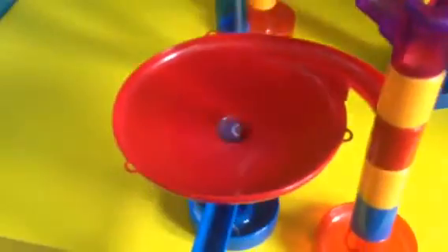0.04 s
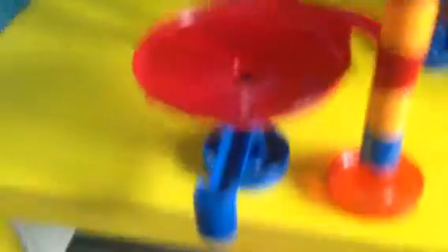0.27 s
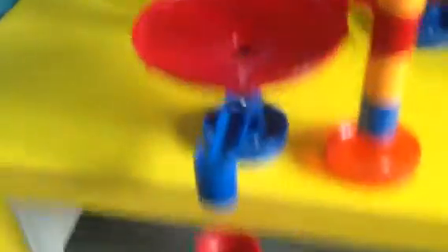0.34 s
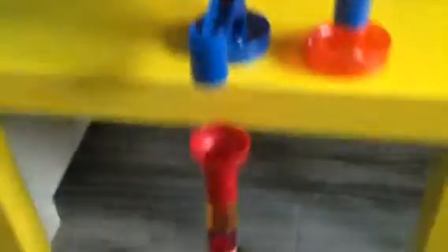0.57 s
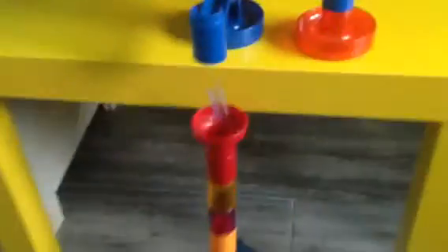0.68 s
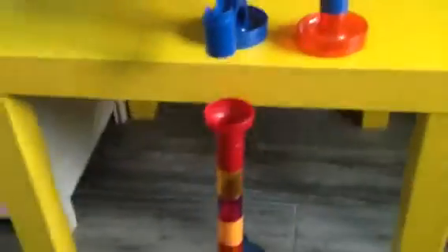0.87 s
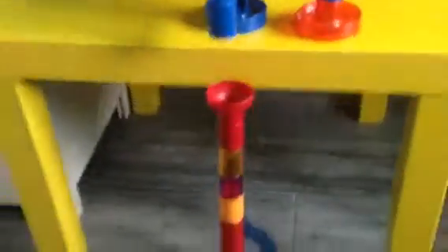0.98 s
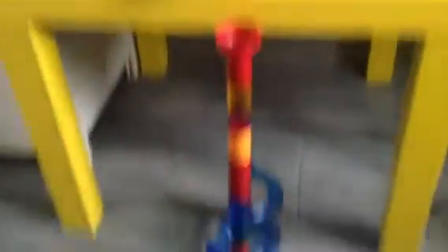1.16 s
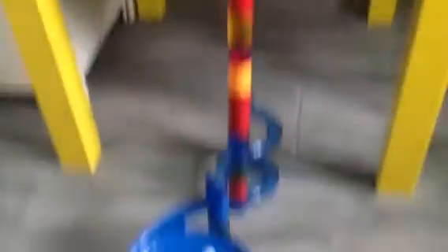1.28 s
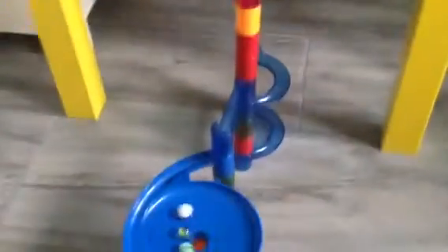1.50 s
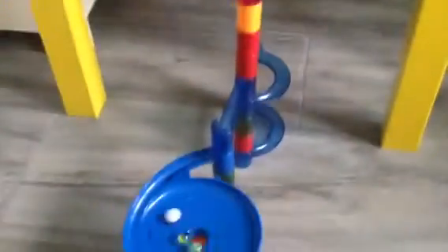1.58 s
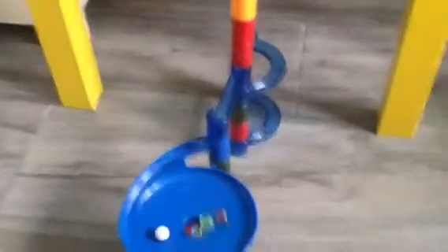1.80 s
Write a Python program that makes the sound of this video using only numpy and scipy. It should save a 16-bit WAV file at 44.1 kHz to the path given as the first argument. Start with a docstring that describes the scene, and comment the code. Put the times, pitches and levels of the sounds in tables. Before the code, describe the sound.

Glass marbles clatter on a plastic marble run in a small room. Light rolling in a funnel gives way to bursts of sharp clicks and hollow knocks, a soft bump on the microphone, and a brief roll in a dish.

```python
"""A small, hard room, where glass marbles run down a plastic marble run.
One whirls round the neck of a funnel and rattles through it and the column below, then knocks down
a chute, a cup, a tower and a spiral into a dish. Rolling is a stream of tiny bumps that keeps the
plastic ringing; each knock is a short crack plus the ring of the struck part, and the room answers.
Faint room tone lies underneath, and one soft bump touches the microphone."""
import sys
import numpy as np
from scipy import signal
from scipy.io import wavfile

SR = 44100
rng = np.random.default_rng(int(sys.argv[2]) if len(sys.argv) > 2 else 0)


def materialize(psi):
    """Save the field psi as 16-bit PCM at rate SR to the path in sys.argv[1].

    A 1-D psi becomes a single channel; in a 2-D psi each row is a channel.
    """
    bounded = np.clip(np.atleast_2d(psi).T, -1, 1)
    quanta = np.round(bounded * 32767).astype(np.int16)
    wavfile.write(sys.argv[1], SR, quanta)


N = 81585


def amp(db):
    """Decibels to gain."""
    return 10 ** (np.asarray(db) / 20)


def unit(x):
    """Scales to an energy of one."""
    return x / np.sqrt(np.sum(x ** 2) + 1e-20)


def curve_at(points, hz):
    """Reads a curve on a log-frequency axis."""
    point_hz, value = np.transpose(points)
    return np.interp(np.log(hz + 1), np.log(point_hz + 1), value)


def add(mix, start_s, sound):
    """Mixes a sound in at a time."""
    span = mix[round(start_s * SR):][:len(sound)]
    span += sound[:len(span)]


def eq_pulse(*curves, size=4096):
    """A minimum-phase click coloured by the stacked EQ curves."""
    hz = abs(np.fft.fftfreq(size, 1 / SR))
    log_gain = np.log(amp(sum(curve_at(points, hz) for points in curves)))
    spectrum = np.exp(np.conj(signal.hilbert(log_gain)))
    return np.fft.ifft(spectrum).real[:size // 2]


# Colour of the room tone. Each row: frequency in Hz, relative level in dB.
ROOM_TONE_EQ = [(25, -58), (70, -23), (160, 13.5), (300, -16), (700, -6.5), (1600, 15.5), (3500, -2),
                (8000, -20.5), (16000, -42)]
def room_tone(level_db=-64.5):
    """A faint, steady bed of coloured noise."""
    noise = signal.fftconvolve(rng.standard_normal(N), eq_pulse(ROOM_TONE_EQ))[:N]
    return amp(level_db) * np.sqrt(N) * unit(noise)


# Fader rides for the rolling in the funnel and in the dish; the end levels hold before and after.
# Each row: time in seconds, level in dB.
FUNNEL_FADER = [(0, -41.5), (.075, -52), (.11, -43.5), (.2, -41.5), (.28, -40), (.42, -35), (.5, -40),
                (.6, -45.5), (.67, -43), (.76, -44.5), (1.05, -55.5), (1.3, -52)]
DISH_FADER = [(1.25, -45), (1.4, -50.5), (1.52, -47), (1.59, -36.5), (1.65, -50), (1.72, -53), (1.79, -51),
              (1.85, -62)]
# Colour of one tiny bump on each surface. Each row: frequency in Hz, relative level in dB.
FUNNEL_GRAIN_EQ = [(40, -44), (100, -21), (170, -3.5), (350, -9.5), (700, 1), (1100, -1.5), (2000, -4),
                   (3200, -13.5), (6000, -25), (10000, -23), (16000, -22)]
DISH_GRAIN_EQ = [(40, -24.5), (170, -9.5), (400, -5), (800, 1.5), (1100, -4), (1650, 6.5), (2500, 6.5),
                 (5000, -12), (10000, -12.5), (16000, -32.5)]
def rolling(part, grains_per_s=2500, spread_db=4, ring_db=0.5, dry_db=1):
    """Tiny bumps under a rolling marble keep the part's modes sounding."""
    fader, eq = {"funnel": (FUNNEL_FADER, FUNNEL_GRAIN_EQ), "dish": (DISH_FADER, DISH_GRAIN_EQ)}[part]
    sizes = amp(spread_db * np.minimum(rng.exponential(1, N), 4))
    signs = rng.choice([-1., 1.], N)
    hits = rng.random(N) < grains_per_s / SR
    grains = signal.fftconvolve(sizes * signs * hits, eq_pulse(eq))[:N]
    direct = grains + amp(ring_db) * signal.fftconvolve(grains, plastic_ring(part))[:N]
    sound = amp(dry_db) * direct + signal.fftconvolve(direct, room_tail())[:N]
    level_db = np.interp(np.arange(N) / SR, *np.transpose(fader))
    return unit(sound) * np.sqrt(N) * amp(level_db)


# Resonances of each plastic part. Each row: pitch in Hz, bandwidth in Hz, relative level in dB.
FUNNEL_MODES = [(208, 31, 5.5), (670.5, 34, 5.5), (1288, 97, 11), (1605, 38, 15), (2454, 18, 6.5),
                (4306, 210, 2.5), (6140, 130, 6.5), (8870, 270, 2)]
COLUMN_MODES = [(140, 20, 9), (172, 20, 10), (218, 7, 21), (577, 10, 13), (669, 9, 15), (830, 14, 9),
                (1070, 30, 7), (1201, 10, 15), (1272, 14, 16), (1465, 20, 7), (1535, 30, 8), (1580, 20, 10),
                (1615, 7, 26), (2570, 20, 3), (2980, 25, 7), (3760, 80, 3), (4400, 200, 1), (4772, 25, 5)]
CHUTE_MODES = [(190, 20, 8), (680, 30, 3), (1211, 10, 21), (1320, 18, 13), (1405, 18, 12), (1491, 15, 14),
               (1612, 9, 19), (2315, 40, 0), (3677, 200, 3), (6153, 90, 0), (10500, 500, -2)]
CUP_MODES = [(1860, 14, 9), (1965, 30, 3), (3882, 8, 14), (7407, 70, 1), (9274, 12, 13), (9315, 20, 8),
             (9393, 20, 8), (10227, 120, 2), (11010, 60, 1), (12000, 200, 1), (14200, 400, 5),
             (14800, 400, 4)]
TOWER_MODES = [(1613, 95, -2.5), (1977, 38, -4), (2578, 42, 0), (2870, 25, 0), (3135, 40, -3.5),
               (3640, 16, 3.5), (4520, 590, -4.5)]
SPIRAL_MODES = [(520, 40, 1), (1556, 30, 3), (1675, 30, 0), (1986, 30, 0), (2178, 30, 0), (2770, 120, -1),
                (3560, 60, -2), (4950, 260, 9)]
DISH_MODES = [(409, 14, 6), (748, 12, 5), (843, 6, 14), (1428, 20, 5), (1560, 40, 3), (1690, 16, 5),
              (1975, 20, 3), (2447, 20, 3), (2770, 40, 1), (3967, 30, 1), (4870, 200, 0)]
# How strongly each part rings. Each entry: part, trim in dB.
RING_TRIM_DB = {"funnel": -1.4, "column": -0.1, "chute": 0.7, "cup": -2.5, "tower": 0.5, "spiral": -1.3,
                "dish": 1.3}
def plastic_ring(part, start_s=0, size=12000):
    """The decaying modes of one part; each new knock adds in step with the ring already sounding."""
    modes = {"funnel": FUNNEL_MODES, "column": COLUMN_MODES, "chute": CHUTE_MODES, "cup": CUP_MODES,
             "tower": TOWER_MODES, "spiral": SPIRAL_MODES, "dish": DISH_MODES}[part]
    t = np.arange(size) / SR
    ring = np.zeros(size)
    for hz, width_hz, db in modes:
        gain = amp(db + RING_TRIM_DB[part]) * 2 * np.pi * width_hz / SR
        decay = np.exp(-np.pi * width_hz * t)  # narrow modes hang on longest
        ring += gain * decay * np.cos(2 * np.pi * hz * (start_s + t))
    return ring


# The room's reverb. Each row: frequency in Hz, time to fall 60 dB in seconds.
REVERB_TIMES = [(150, 0.33), (500, 0.49), (1400, 0.29), (3700, 0.39), (7000, 0.33), (10000, 0.3),
                (15000, 0.18)]
def room_tail(size=26000, build_s=0.0052):
    """Dense reflections that build up quickly, each band dying at its own speed."""
    hz, t, bands = signal.stft(rng.standard_normal(size), SR, nperseg=256)
    decay = amp(-60 * t / curve_at(REVERB_TIMES, hz)[:, None])
    tail = signal.istft(bands * decay, SR)[1][:size]
    fade_in = 1 - np.exp(-np.arange(size) / SR / build_s)
    return unit(tail * fade_in)


# Cue list of knocks. Each row: start in seconds, part struck, bass, middle, presence and treble EQ
# in dB, level of the crack over its room tail in dB.
KNOCK_CUES = [ (0.142, "funnel", -4, -9, -10, -39, -12), (0.212, "funnel", -18, -15, -8, -12, -9),
              (0.2204, "funnel", -12, -7, -1.5, -9, -7.5), (0.2401, "funnel", -1, 1, 6, -13.5, -1.5),
              (0.3206, "funnel", -7, 1, 5.5, -4, -0.5), (0.3364, "funnel", 1, 0.5, 3.5, -2, 3.5),
              (0.349, "funnel", -3, -9, 8, -1.5, 3), (0.3728, "column", 9, 8, 6.5, -3, 4),
              (0.3838, "column", -29, 10, -4, -18, -32), (0.4045, "column", 4.5, 6, 6, -4.5, 3),
              (0.4281, "column", 1.5, 1.5, 2, -14, 5), (0.6941, "chute", 1, 9, 10.5, 4.5, 0),
              (0.7935, "cup", -5, 0.5, 6.5, 3.5, 6.5), (.8045, "cup", -8, 11.5, -1.5, 14.5, -17),
              (0.8307, "cup", -8, -3, 5.5, 9, 0), (0.8467, "cup", -11, 4, 6.5, 7, -14),
              (0.9129, "tower", -2, 15, 1.5, 9, -4.5), (.9228, "tower", -3, -5.5, 7, -1.5, 2.5),
              (0.934, "tower", -5, -20, 2.5, -2, 1), (.9640, "tower", -5.5, 3.5, -22, -8.5, 2),
              (1.0295, "tower", -28, -8, -9.5, -16, 2.5), (1.0615, "tower", -27, -6, -11.5, -17.5, 2.5),
              (1.1040, "tower", -13, 0, 3, 6, -2), (1.1096, "tower", 2, 14.5, 21.5, -3, -3.5),
              (1.1181, "tower", -6.5, 14, 8.5, 11, -5), (1.1273, "tower", -2.5, -8, -7.5, -6, 12.5),
              (1.1993, "tower", -4.5, 11.5, 7.5, -0.5, -3.5), (1.362, "spiral", -7, 11, 4, 0.5, -1.5),
              (1.4055, "spiral", 7, 12, 13, 5, -2.5), (1.4156, "spiral", -20, 9, 5.5, -4, 2.5),
              (1.4875, "dish", 1, 9, 6.5, -0.5, 1), (1.5035, "dish", 0, -1.5, 7.5, -2.5, -6),
              (1.5560, "dish", -14, 0, 1, -8, -2.5)]
# Where bass, middle, presence and treble sit, in Hz.
KNOCK_BANDS_HZ = [500, 1400, 4500, 12000]
# Colour of glass on plastic, shared by all knocks. Each row: frequency in Hz, gain in dB.
GLASS_ON_PLASTIC_EQ = [(30, 11), (90, -27), (170, -13), (350, -8), (850, -7), (1400, -4.5), (2200, -3),
                       (3200, -3), (5200, -3), (7200, -2), (10000, -1), (13000, -5), (15200, -9)]
def knocks(mix, rise_s=0.00024, crack_s=0.002, shiver_s=0.013, shiver_db=-1, dry_ring_db=5.5):
    """Each contact cracks against the wall, shakes the track, rings the part and fills the room."""
    for start_s, part, *bands_db, crack_db in KNOCK_CUES:
        tail = room_tail()
        t = np.arange(len(tail)) / SR
        crack_noise, shiver_noise = rng.choice([-1., 1.], (2, len(t)))
        crack = unit(crack_noise * (1 - np.exp(-t / rise_s)) * np.exp(-t / crack_s))
        shiver = unit(shiver_noise * np.exp(-t / shiver_s))  # the track shakes a little longer
        sound = amp(crack_db) * unit(crack + amp(shiver_db) * shiver) + tail
        ring = plastic_ring(part, start_s)
        add(sound, 0, amp(dry_ring_db) * ring)
        add(sound, 0, signal.fftconvolve(ring, tail))
        colour = eq_pulse(GLASS_ON_PLASTIC_EQ, list(zip(KNOCK_BANDS_HZ, bands_db)))
        add(mix, start_s, signal.fftconvolve(sound, colour))


def microphone_bump(size=1500, pitch_hz=546, decay_s=0.0014, band_hz=(150, 1300), gain_db=-15):
    """A dull, close tap on the microphone's case: little more than one swing."""
    t = np.arange(size) / SR
    swing = -np.sin(2 * np.pi * pitch_hz * t) * np.exp(-t / decay_s)
    return amp(gain_db) * signal.lfilter(*signal.butter(2, band_hz, "bandpass", fs=SR), swing)


def scene():
    """Room tone and both rolling layers run throughout; the knocks and the bump land on top."""
    mix = room_tone() + rolling("funnel") + rolling("dish")
    knocks(mix)
    add(mix, start_s=1.0135, sound=microphone_bump())
    return mix[None]


def record(dry, low_cut_hz=150, high_cut_hz=15450):
    """The microphone's low cut thins the bass, and a steep high cut takes off the very top."""
    thinned = signal.lfilter(*signal.butter(2, low_cut_hz, "highpass", fs=SR), dry)
    high_cut = signal.firwin(255, high_cut_hz, window=("kaiser", 8), fs=SR)
    return signal.oaconvolve(thinned, high_cut[None], "same")


dry = scene()
out = record(dry)
materialize(out)
```